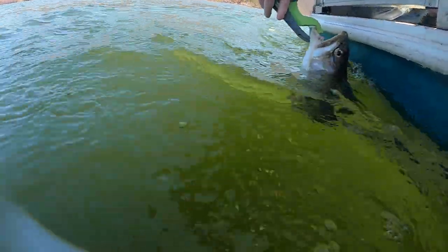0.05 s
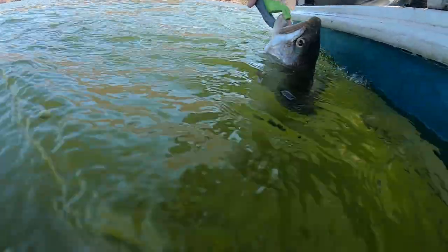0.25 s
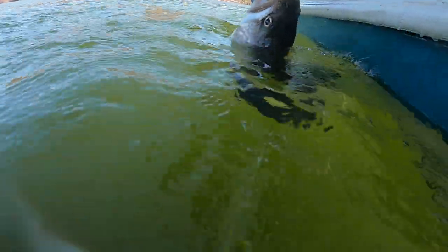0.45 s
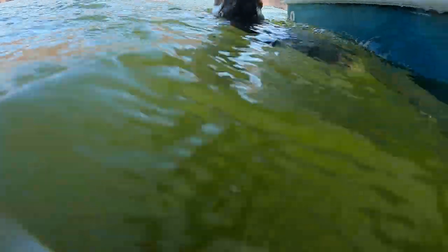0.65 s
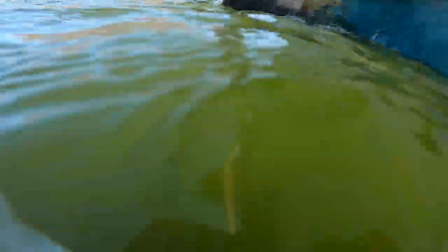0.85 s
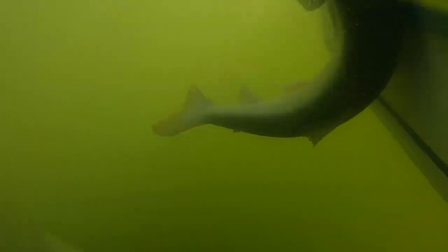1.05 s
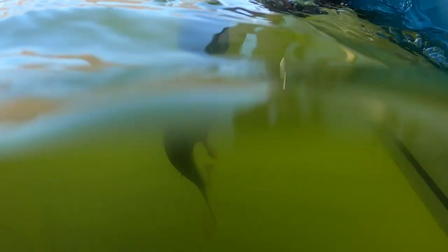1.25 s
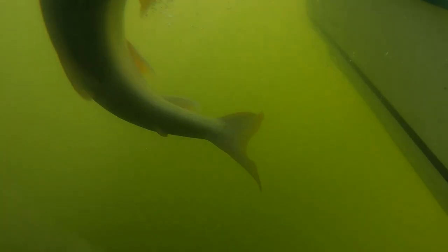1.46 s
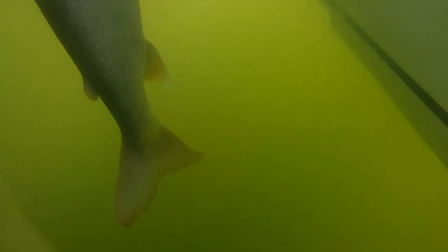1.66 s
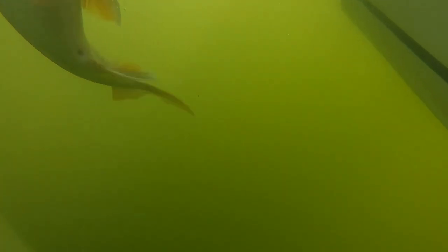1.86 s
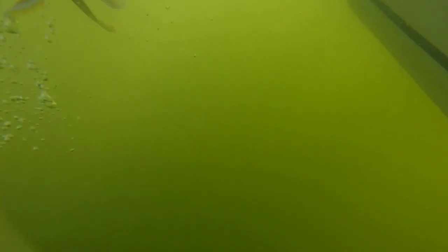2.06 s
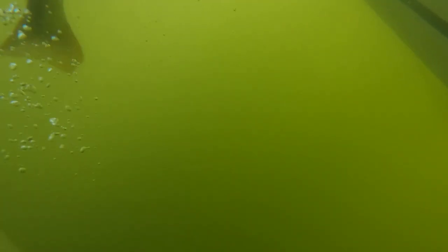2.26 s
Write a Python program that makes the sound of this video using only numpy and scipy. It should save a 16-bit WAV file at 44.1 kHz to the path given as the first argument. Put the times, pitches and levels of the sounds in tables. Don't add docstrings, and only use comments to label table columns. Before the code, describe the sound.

Water splashes and drips beside a boat, then slaps the microphone into muffled, bubbling underwater rumble

```python
import sys
import numpy as np
from scipy import signal
from scipy.fft import rfft, irfft
from scipy.io import wavfile

SR = 44100
rng = np.random.default_rng(int(sys.argv[2]) if len(sys.argv) > 2 else 0)


def transcribe(signal):
    frames = np.atleast_2d(signal).T
    limited = np.clip(frames, -1, 1)
    pcm = np.round(limited * 32767).astype(np.int16)
    wavfile.write(sys.argv[1], SR, pcm)


def volts_from_db(level):
    exponent = np.asarray(level, float) / 20
    return 10 ** exponent


N = 101959
TIME_S = np.arange(N) / SR
RIGHT_SHUT_S = .883
GRAINS_PER_S = 9000
OPPOSITE = np.array([[1], [-1]])


def rms_one(x):
    return x / np.sqrt(np.mean(x ** 2) + 1e-20)


def in_time(rows):
    s, *columns = np.transpose(rows)
    return [np.interp(TIME_S, s, c) for c in columns]


def at_hz(points, hz):
    point_hz, value = np.transpose(points)
    return np.interp(np.log(hz), np.log(point_hz), value)


def filtered(x, order, hz, kind="low"):
    return signal.sosfilt(signal.butter(order, hz, kind, fs=SR, output="sos"), x)


def sides(pan_db):
    left = volts_from_db(np.asarray(pan_db) / 2)
    return 2 * np.array([left, 1 / left]) / (left + 1 / left)


def drift(rate):
    every = 40
    r = np.exp(-2 * np.pi * rate * every / SR)
    white = rng.standard_normal(N // every + 2002)
    slow = signal.lfilter([1], [1, -2 * r, r * r], white)[2000:]
    return np.interp(np.arange(N) / every, np.arange(len(slow)), rms_one(slow))


def bands(spectrum, patchy_db, rate):
    hz = np.fft.rfftfreq(N, 1 / SR) + 1
    together = drift(rate / 2)
    white = rfft(rng.standard_normal((2, N))) * volts_from_db(at_hz(spectrum, hz))
    for k in range(30):
        place = 3 * np.log2(hz / 20) - k
        part = irfft(white * np.clip(1 - np.abs(place), 0, 1), N)
        depth_db = patchy_db * min(.3 + k / 16, 1)
        yield 20 * 2 ** (k / 3), part * volts_from_db(depth_db * (.45 * together + drift(rate)))


def grains(spread_db, shape):
    level = volts_from_db(spread_db * rng.exponential(1, N))
    return level * rng.standard_normal(shape) * (rng.random(N) < GRAINS_PER_S / SR)


def add(out, s, wave):
    i = max(int(s * SR), 0)
    out[..., i:i + wave.shape[-1]] += wave[..., :N - i]


def pops(rows, rise, swell_cycles, puff_db, puff_t60):
    out, t = np.zeros((2, N)), np.arange(SR // 8) / SR
    for s, db, hz, t60, pan_db in rows:
        climb = 1 + rise * np.minimum(t / t60, 1)
        ring = np.sin(2 * np.pi * hz * t * climb) * volts_from_db(-60 * t / t60)
        edges = np.clip([hz * 0.52, hz * 1.15], 10, .45 * SR)
        puff = rms_one(filtered(rng.standard_normal(len(t)), 2, edges, "band"))
        soft = np.sin(np.pi / 2 * np.minimum(t * hz / swell_cycles, 1)) ** 2
        wave = soft * (ring + puff * volts_from_db(puff_db - 60 * t / puff_t60))
        add(out, s, volts_from_db(db + 3) * sides(pan_db)[:, None] * wave)
    return out


def airy(spectrum, patchy_db, rate):
    # frequency in Hz, left-right likeness from 0 to 1.
    likeness = [(60, 0.12), (210, 0.99), (720, 0.79), (2500, 0.31), (8650, 0.19)]
    out = 0
    for hz, (mid, side) in bands(spectrum, patchy_db, rate):
        alike = np.clip(at_hz(likeness, hz), 0, 1)
        out = out + np.sqrt(1 + alike) * mid + np.sqrt(1 - alike) * side * OPPOSITE
    return rms_one(out)


def lapping():
    # time in seconds, level in dB, left-right difference in dB.
    bustle = [
        (0, -40, -1),
        (.1, -51, 1),
        (.4, -47.5, -0.5),
        (.74, -47.5, 2),
        (.87, -44, -9.5),
    ]
    # frequency in Hz, density in dB per Hz.
    lap_spectrum = [(200, -18), (900, -9.5), (1550, -14), (2800, -18), (7900, -29), (8800, -39),
                    (15000, -49)]
    level_db, pan_db = in_time(bustle)
    return volts_from_db(level_db + 0.5) * sides(pan_db) * airy(lap_spectrum, patchy_db=2, rate=31)


def wind():
    # frequency in Hz, density in dB per Hz.
    wind_spectrum = [(15, -32.5), (25, 0.5), (102, -13.5), (134, -6), (158, -13), (500, -28), (650, -30.5),
                     (1100, -120)]
    level_db, pan_db = -37, 1
    return volts_from_db(level_db) * sides(pan_db)[:, None] * airy(wind_spectrum, patchy_db=2.0, rate=4.0)


def glugs():
    # start in seconds, peak in dB, start pitch in Hz, end pitch in Hz, length in seconds.
    pockets = [(0, -32, 838, 1800, .055), (0, -28.5, 91, 108, 0.065), (0.327, -39, 1145, 1170, .015),
               (0.392, -23, 49.3, 55.9, 0.026), (0.664, -23.5, 210, 170, 0.055),
               (0.705, -27, 185, 220, 0.075), (.94, -57, 1100, 1620, .035), (1.21, -30, 535.6, 584, 0.11),
               (1.47, -15, 28.8, 31.2, .055), (1.695, -25, 255, 360, 0.06), (1.76, -13.5, 275, 350, 0.055),
               (1.797, -17, 335, 355, .045), (1.829, -11, 353, 345, 0.062), (1.925, -25, 740, 770, .08),
               (1.928, -20, 354, 349, 0.05), (2.07, -21, 452.7, 470, 0.06), (2.095, -18, 170, 165, 0.065),
               (2.115, -25, 940, 850, .06), (2.122, -16.5, 393, 460, 0.045), (2.13, -20, 540, 655, 0.085),
               (2.216, -23, 417, 425, 0.07), (2.222, -23, 570, 600, 0.06)]
    attack, wobble_db = 0.048, -0.5
    out, waver = np.zeros(N), .075 * drift(50)
    for s, db, start_hz, end_hz, length in pockets:
        u = np.linspace(0, 1, int(length * SR))
        unsteady = np.roll(waver, -int(s * SR))[:len(u)]
        hz = start_hz * (end_hz / start_hz) ** (.6 * u + .4 * u ** 4)
        hz = hz + min(start_hz, 300) * unsteady
        swell = np.minimum(u / attack, 1) * (1 - u ** 1.36)
        add(out, s, volts_from_db(db) * swell * np.sin(2 * np.pi * np.cumsum(hz) / SR))
    return out * volts_from_db(wobble_db * drift(43))


def droplets():
    # start in seconds, peak in dB, pitch in Hz, left-right difference in dB.
    drops = [(0.0203, -37.5, 2680, 13), (0.213, -42, 3830, -1.5), (0.2653, -43, 2800, -1),
             (0.3262, -37, 2620, -1), (0.609, -25, 4960, -5), (0.646, -39, 2620, 0),
             (0.851, -26.5, 5730, -19), (0.384, -33, 3900, -2.0), (0.404, -17, 7060, -3),
             (0.411, -32.5, 3170, 9), (0.4368, -22, 3230, -3.5), (0.4428, -15.5, 4160, -6.5),
             (0.4456, -24.5, 3470, 24.5), (0.4594, -36, 3800, -7), (0.525, -34, 4030, -0.5),
             (0.607, -21.5, 3460, 10), (0.639, -33, 2640, 5), (0.658, -32.5, 3640, 8),
             (0.838, -24.5, 1685, -10), (0.8652, -20, 5360, -18)]
    cycles = 43.4
    rows = [(s, db, hz, cycles / hz, pan_db) for s, db, hz, pan_db in drops]
    return pops(rows, rise=.12, swell_cycles=6.3, puff_db=-9, puff_t60=.012)


def snaps(rows):
    t60_s, dull_hz = 0.0064, 5000
    out, t = np.zeros((2, N)), np.arange(SR // 40) / SR
    for s, db, low_hz, high_hz, pan_db in rows:
        mid, side = rng.standard_normal((2, len(t))) * volts_from_db(-60 * t / t60_s)
        edges = np.clip([low_hz, high_hz], 10, .45 * SR)
        burst = filtered(mid + 0.26 * side * OPPOSITE, 3, edges, "band")
        burst = filtered(burst, 1, dull_hz)
        add(out, s, volts_from_db(db) * sides(pan_db)[:, None] * burst / np.abs(burst).max())
    return out


def spray():
    # middle in seconds, level in dB, width in seconds, pitch in Hz, left-right difference in dB.
    bursts = [
        (0.448, -31, 0.019, 4860, -1.5),
        (.635, -50, 0.03, 3800, -1),
        (0.858, -41, 0.035, 5370, -14.5),
    ]
    out = 0
    for s, db, width, hz, pan_db in bursts:
        fine = grains(3.8, (2, N))
        shared = fine + 0.05 * fine[::-1] + 1e-18
        hissing = rms_one(filtered(shared, 3, [hz * .45, hz * 1.3], "band"))
        out = out + volts_from_db(db) * sides(pan_db)[:, None] * hissing * np.exp(-((TIME_S - s) / width) ** 2)
    return out


def surface():
    # start in seconds, peak in dB, low edge in Hz, high edge in Hz, left-right difference in dB.
    films = [(.07, -37, 4410, 6930, -5), (.079, -38.5, 4570, 12100, 0), (.4035, -25, 5640, 15200, -5.5),
             (.4125, -38, 6970, 15500, -4), (.4374, -20, 916, 11000, 1), (.4444, -23.5, 1200, 11920, -2),
             (.4888, -34.5, 2800, 8850, -4.5), (.5085, -42, 3500, 14900, 0),
             (.5257, -40.5, 2510, 13170, -2), (.594, -44, 3000, 7000, 1), (.626, -38.5, 3500, 12000, 0.5),
             (.64, -40, 5950, 12900, 0), (.682, -47, 6000, 12700, 2.5), (.751, -42, 4000, 8000, -1.5)]
    port_hz, left_shut_s, closing_s = 8300, .879, 0.0014
    splash = filtered(spray() + droplets(), 2, port_hz)
    air = lapping() + wind() + splash + snaps(films)
    return air * np.clip(([[left_shut_s], [RIGHT_SHUT_S]] - TIME_S) / closing_s, 0, 1)


def slaps():
    # start in seconds, peak in dB, pitch in Hz, 60 dB decay in seconds, left-right difference in dB.
    blows = [(.858, -14.5, 134.4, 0.13, -57), (.869, -17, 527, 0.023, -37), (.8795, 1, 544, 0.011, -52),
             (.8965, -20, 563, 0.043, -71), (1.0515, 5.5, 82.5, 0.011, 31), (1.052, -20.5, 869, 0.031, 9.5),
             (1.052, -20, 213, 0.024, -12), (.895, -17.5, 311, 0.018, -61), (1.146, -10, 277, 0.028, -11),
             (1.146, -11.5, 88, 0.041, -4), (1.2, -12, 58, 0.043, 9), (1.692, -6.5, 150, 0.027, -1)]
    return pops(blows, rise=0.027, swell_cycles=0.61, puff_db=-17.0, puff_t60=0.025)


def bubbles():
    per_s, cycles, low_hz, high_hz, muffle_hz = 160, 31, 254.2, 1500, 1800
    sizes = volts_from_db(3.4 * np.minimum(rng.exponential(1, N), 4)) * rng.choice([-1, 1], N)
    born = rng.random(N) < per_s * volts_from_db(4.0 * drift(8)) / SR
    dealt = rng.integers(0, 24, N)
    out = 0
    for k, hz in enumerate(np.geomspace(low_hz, high_hz, 24)):
        r, w = volts_from_db(-60 * hz / cycles / SR), 2 * np.pi * hz / SR
        births = sizes * born * (dealt == k) + 1e-18
        ring = signal.lfilter([np.sin(w)], [1, -2 * r * np.cos(w), r * r], births)
        out = out + ring * (300 / hz) ** 0.077
    membrane = signal.cheby2(8, 50, muffle_hz, fs=SR, output="sos")
    return rms_one(signal.sosfilt(membrane, out))


def flow():
    # time in seconds, level in dB, left-right difference in dB, brightness in dB.
    stream = [(.89, -26.5, -65, -26), (.94, -52, -50, -18), (1.04, -44.5, -23, -4), (1.06, -34, -7.5, -1.5),
              (1.15, -29.5, -1.5, -4.5), (1.27, -29.5, -3.5, -9.5), (1.36, -41.5, 0.5, 8),
              (1.43, -33.5, 2, -1.5), (1.62, -28.5, 1.5, 1.5), (1.7, -24.5, 1, -1.5),
              (1.85, -24.5, 0.5, -4.5), (1.95, -25.5, 0.5, 6), (2.0, -28, -0.5, 0), (2.12, -22, 0, -1.5),
              (2.31, -28.5, 0, 3)]
    # time in seconds, unlikeness of the ports in dB.
    apart = [(1, 0.5), (1.3, -4), (1.5, -17), (2.31, -47)]
    # frequency in Hz, density in dB per Hz.
    rumble = [(25, 2.5), (60, 2.5), (200, -12), (750, -13.5), (1200, -25.5), (1550, -23.5), (1780, -68),
              (7000, -112)]
    bubble_db, dull_hz = -11.5, 694
    level_db, pan_db, bright_db = in_time(stream)
    apart_db, = in_time(apart)
    mid, side = rms_one(sum(part for hz, part in bands(rumble, patchy_db=4.0, rate=20.0)))
    mid = mid + volts_from_db(bubble_db) * bubbles()
    low = signal.sosfiltfilt(signal.butter(3, dull_hz, fs=SR, output="sos"), [mid, side])
    mid, side = low + volts_from_db(bright_db) * ([mid, side] - low)
    sunk = np.clip((TIME_S - RIGHT_SHUT_S) / 0.0059, 0, 1)
    return sunk * volts_from_db(level_db + 3) * sides(pan_db) * (mid + volts_from_db(apart_db) * side * OPPOSITE)


def sunk_snaps():
    # start in seconds, peak in dB, low edge in Hz, high edge in Hz.
    sunk_films = [
        (0.9645, -60, 3000, 5000),
        (1.0825, -59, 2400, 3500),
        (1.0987, -53, 1800, 6500),
        (1.2251, -48, 1800, 3500),
        (1.4272, -50.5, 2000, 7200),
        (1.6657, -42, 1500, 5000),
        (1.9494, -43, 1900, 3200),
        (2.0149, -44.5, 2200, 3300),
        (2.213, -54.5, 2000, 4500),
    ]
    return snaps([(*row, 0) for row in sunk_films])


def knocks():
    # start in seconds, peak in dB, pitch in Hz.
    hits = [(0.98, -42, 2120), (1.009, -40, 1600), (1.1, -42, 800), (1.331, -24, 832), (1.352, -26, 1090),
            (1.365, -26, 828), (1.376, -31, 1500), (1.449, -30.5, 1500), (1.665, -15.5, 696),
            (1.68, -6, 1403), (1.691, -16.5, 2050), (1.758, -13, 600), (1.764, -8, 1367),
            (1.787, -15.5, 564), (1.868, -16.5, 1310), (1.952, -20, 1500), (1.976, -21.5, 1418),
            (1.965, -16.5, 815), (2.083, -14, 705), (2.111, -12, 1340), (2.194, -13, 924),
            (2.2, -17.5, 1380), (2.222, -22, 608), (2.26, -9, 1120), (2.263, -16, 832)]
    cycles = 36.5
    rows = [(s, db, hz, cycles / hz, 0) for s, db, hz in hits]
    return filtered(pops(rows, rise=0.04, swell_cycles=6.64, puff_db=-15.0, puff_t60=0.012), 3, 1900)


def fizz():
    # time in seconds, level in dB.
    crackle = [(1.0, -81), (1.08, -68.5), (1.15, -69), (1.165, -44.5), (1.184, -72), (1.3, -69.5),
               (1.36, -73), (1.45, -59), (1.79, -66.5), (1.9, -59.5), (2.31, -75)]
    mesh_hz, mesh_width_hz, mesh_db = 3170, 260, 13
    mesh_opens_s, mesh_floods_s, fade_db_per_s = 1.148, 1.175, 90
    level_db, = in_time(crackle)
    fine = grains(2.5, N)
    broad = filtered(fine, 6, [1750, 3400], "band")
    top = filtered(fine, 4, [3400, 5200], "band")
    broad = broad + volts_from_db(-22 + 2 * drift(30)) * top
    edges = [mesh_hz - mesh_width_hz / 2, mesh_hz + mesh_width_hz / 2]
    peak = rms_one(filtered(fine, 2, edges, "band"))
    peak_db = mesh_db - fade_db_per_s * np.clip(TIME_S - mesh_floods_s, 0, .5)
    both = rms_one(broad) + volts_from_db(peak_db) * (TIME_S > mesh_opens_s) * peak
    sunk = TIME_S > RIGHT_SHUT_S
    return sunk * volts_from_db(level_db + 3.3 * drift(25)) * rms_one(both)


def ticks():
    # start in seconds, peak in dB, pitch in Hz.
    mesh_bubbles = [
        (1.037, -57.5, 3400),
        (1.055, -60, 2785),
        (1.377, -57.5, 2780),
        (1.427, -52, 3290),
        (1.666, -36, 2840),
        (1.692, -30, 2910),
        (1.749, -46.5, 3130),
        (1.83, -45.5, 3160),
    ]
    cycles = 66
    rows = [(s, db, hz, cycles / hz, 0) for s, db, hz in mesh_bubbles]
    return filtered(pops(rows, rise=.02, swell_cycles=4.0, puff_db=0.0, puff_t60=.012), 10, 3600)


def underwater():
    return slaps() + flow() + sunk_snaps() + knocks() + fizz() + ticks()


def scene():
    lag_s, lag_ends_s, lag_below_hz, hiss_db = 2 / SR, 1.4, 3800, -100
    hiss = signal.lfilter([.3], [1, -.7], rng.standard_normal((2, N)))
    left, right = surface() + glugs() + underwater()
    lag = lag_s * np.clip((lag_ends_s - TIME_S) * SR / 400, 0, 1).round()
    late = np.interp(TIME_S - lag, TIME_S, left)
    lows = signal.butter(2, lag_below_hz, fs=SR, output="sos")
    left = left + signal.sosfiltfilt(lows, late - left)
    return np.array([left, right]) + volts_from_db(hiss_db) * hiss


def roll_off(x):
    return signal.sosfilt(signal.butter(12, 15800, fs=SR, output="sos"), x)


def record(dry):
    return roll_off(np.clip(dry, -1, 1))


dry = scene()
out = record(dry)
transcribe(out)
```